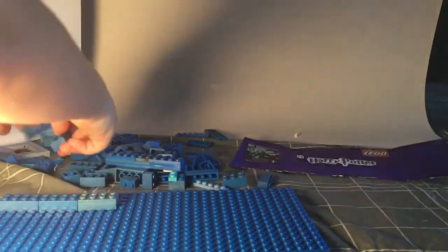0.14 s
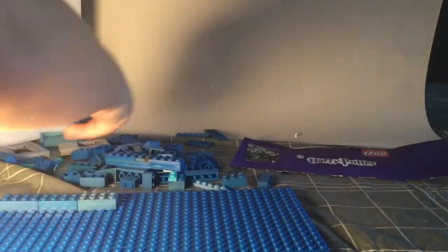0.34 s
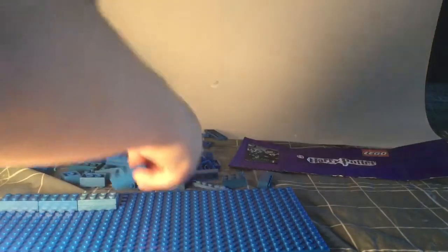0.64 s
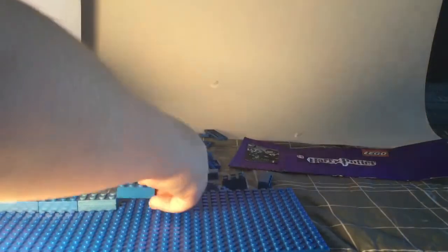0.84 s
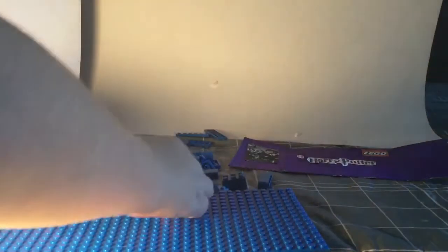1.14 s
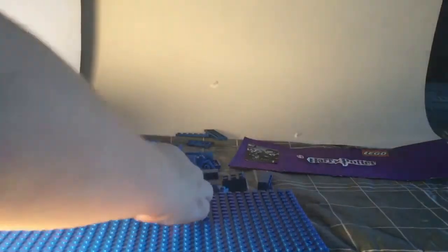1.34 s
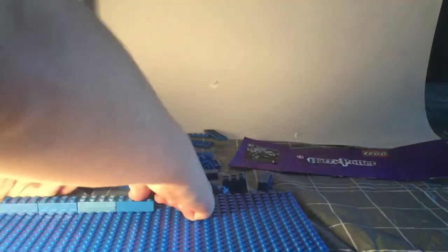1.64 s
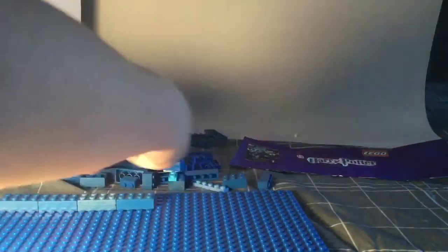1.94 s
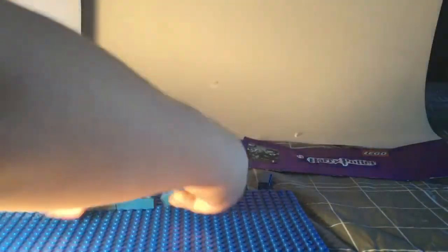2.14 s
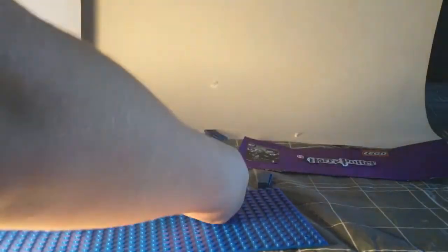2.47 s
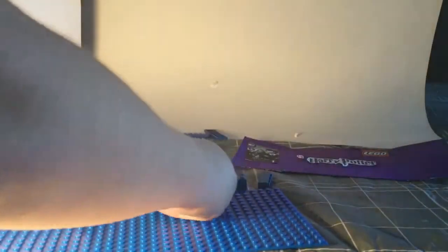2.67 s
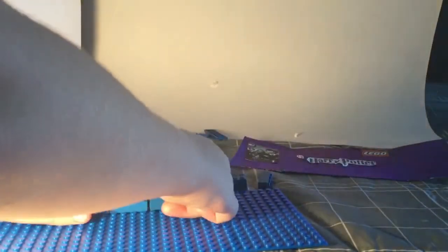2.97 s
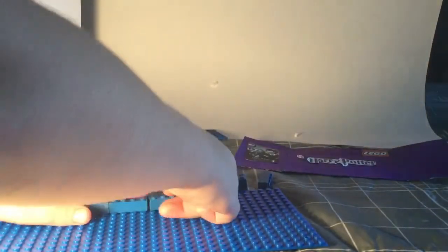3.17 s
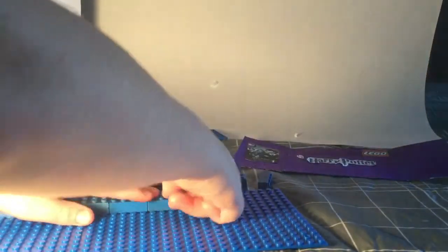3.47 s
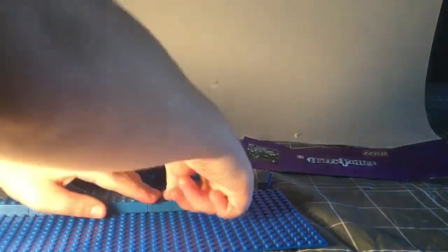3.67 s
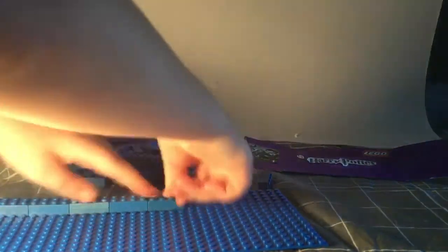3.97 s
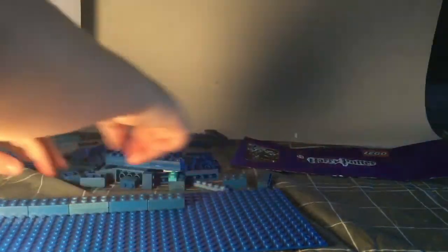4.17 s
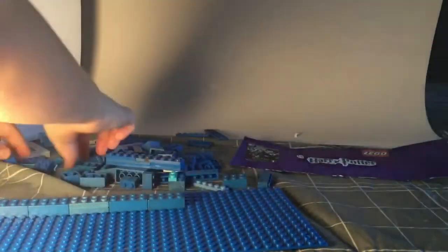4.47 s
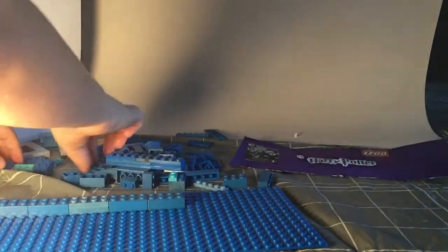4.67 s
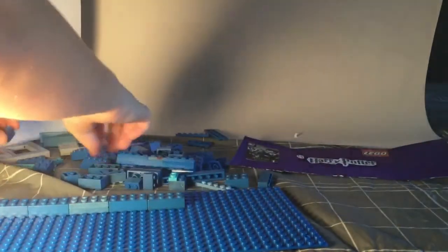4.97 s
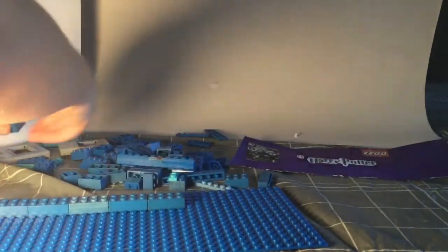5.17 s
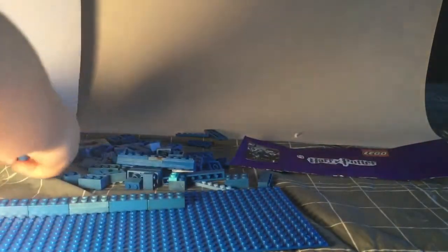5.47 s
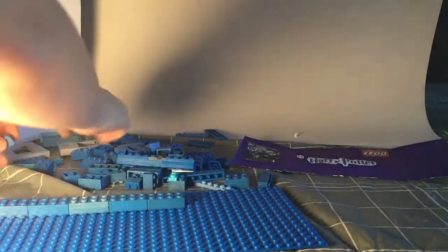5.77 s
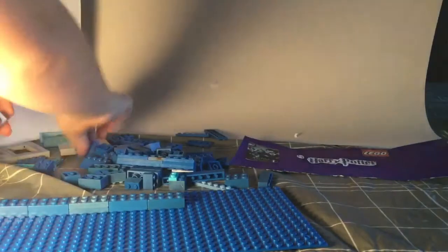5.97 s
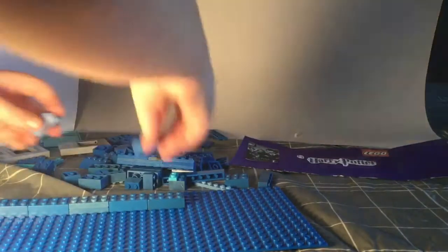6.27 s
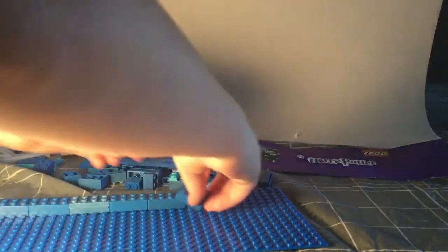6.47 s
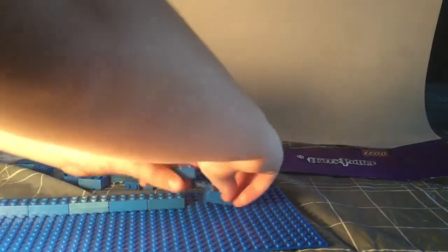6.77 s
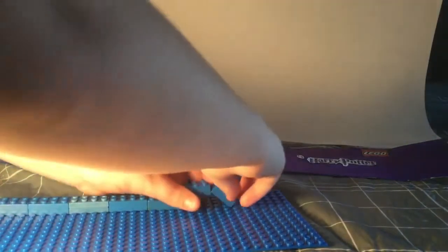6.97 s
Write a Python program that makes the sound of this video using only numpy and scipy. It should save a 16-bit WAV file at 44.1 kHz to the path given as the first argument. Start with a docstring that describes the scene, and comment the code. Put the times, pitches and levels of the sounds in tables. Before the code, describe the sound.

Plastic building bricks click as they are pressed onto a baseplate and rattle in a loose pile, over a faint indoor hum.

```python
"""Plastic building bricks click and rattle, picked from a loose pile and pressed onto a thin baseplate.
Each contact rings the plate and the hollow bricks in a small room; firm presses sound the board below.
Fingers rustle in the pile, palms brush the board, a machine hums and a cricket trills faintly far off.
A noise suppressor shuts the treble whenever nothing rises over the steady hiss."""
import sys
import numpy as np
from scipy import signal
from scipy.fft import rfft, irfft, next_fast_len
from scipy.io import wavfile
from scipy.ndimage import uniform_filter1d, minimum_filter1d

SR = 44100
rng = np.random.default_rng(int(sys.argv[2]) if len(sys.argv) > 2 else 0)


def digitize_waveform(pressure):
    """Quantize a signal to 16-bit integers and store it at the path in sys.argv[1].

    Rows of a 2-D input are taken as channels; values are limited to [-1, 1].
    """
    field = np.atleast_2d(pressure).T
    bounded = np.clip(field, -1, 1)
    quanta = np.round(bounded * 32767).astype(np.int16)
    wavfile.write(sys.argv[1], SR, quanta)


N = 313551

# Plastic meeting plastic. Each row: start in seconds, levels in dB of the plate, brick walls, studs
# and edge tick, then the leading pitch in Hz of the plate and of the walls.
CONTACTS = [(0.0144, -46, -21, -19.5, -29, 1350, 5000), (0.0229, -67, -31, -29, -37.5, 1510, 4200),
            (0.578, -65, -72, -50.5, -85, 1460, 5300), (0.664, -45, -58, -62, -63, 1270, 2400),
            (0.6732, -27.5, -27.5, -33, -43, 1685, 3350), (0.742, -48, -72, -78, -85, 1590, 4020),
            (0.8306, -78, -53, -76, -85.5, 1780, 4930), (0.856, -29, -26, -37.5, -34.5, 1396, 4900),
            (0.9673, -40.5, -43, -60, -68, 1730, 2840), (0.9802, -45, -50, -57, -56.5, 1290, 3910),
            (1.0105, -35.5, -50, -63, -59.5, 1290, 3290), (1.0282, -39, -36, -57, -59.5, 1900, 2320),
            (1.0339, -14, -16, -25.5, -31, 1690, 3100), (1.038, -25, -39, -36, -48, 1890, 3590),
            (1.186, -48.5, -50.5, -53, -51.5, 1580, 4170), (1.2279, -48, -82.5, -86, -85, 1620, 3600),
            (1.2562, -37.5, -52.5, -73, -85, 1670, 3610), (1.382, -45, -35.5, -40.5, -36, 1220, 3200),
            (1.4002, -47, -47, -50, -47, 1550, 3500), (1.42, -44, -45, -52, -53, 1700, 3840),
            (1.4487, -40, -34.5, -40, -30.5, 1620, 5300), (1.46, -38, -62, -64, -63, 1650, 3920),
            (1.4782, -60, -71, -61, -49.5, 1640, 5170), (1.49, -46.5, -47, -56, -52, 1560, 2720),
            (1.516, -55, -48, -50, -50, 1670, 3150), (1.5379, -31.5, -49, -43.5, -36, 1600, 2700),
            (1.6937, -44.5, -50, -48, -47.5, 1650, 2630), (1.72, -40.5, -45, -47.5, -43.5, 1530, 3210),
            (1.7522, -50.5, -60, -61.5, -55.5, 1750, 3700), (2.1498, -29, -36, -37, -43.5, 1560, 4170),
            (2.1634, -30.5, -32, -37, -48, 1753, 2990), (2.168, -31, -50, -53.5, -62.5, 1516, 3490),
            (2.2106, -29, -37.5, -43, -54, 1610, 2760), (2.2301, -34.5, -47, -39, -35.5, 1410, 3510),
            (2.241, -40, -64, -48, -54, 1500, 3490), (2.2758, -40, -48, -42.5, -44, 1690, 2660),
            (2.305, -38, -49, -49, -55, 1490, 2550), (2.3195, -37, -41.5, -50, -61, 1390, 2600),
            (2.3255, -60, -43, -44, -37.5, 1340, 3770), (2.365, -42, -79, -85, -85, 1210, 2640),
            (2.3914, -44.5, -42, -49.5, -44.5, 1660, 2700), (2.4242, -48, -69, -49.5, -53.5, 1640, 3420),
            (2.4502, -52.5, -52, -51, -62, 1770, 2490), (2.5121, -38.5, -55, -78, -85, 1440, 2340),
            (2.6046, -41, -51.5, -48, -49.5, 1640, 2370), (2.637, -47, -57, -57, -56, 1460, 3940),
            (2.646, -22, -22.5, -30.5, -27, 1610, 3230), (2.656, -49, -31, -45, -56, 1510, 3520),
            (2.7231, -44, -45, -51, -50, 1680, 3360), (2.8423, -36, -60, -71, -84, 1620, 2900),
            (2.8537, -42.5, -37.5, -43.5, -42, 1680, 3520), (2.8659, -43, -40, -57, -65.5, 1680, 3500),
            (2.8773, -47, -47, -58, -67.5, 1650, 3200), (2.895, -48, -61, -80, -85, 1650, 3600),
            (2.9969, -27.5, -37, -39, -32.5, 1640, 3070), (3.0092, -41, -38.5, -42, -40, 1650, 2650),
            (3.0579, -33, -42, -57.5, -48.5, 1570, 2830), (3.065, -35.5, -48.5, -63.5, -65, 1580, 3600),
            (3.0709, -39.5, -47.5, -64, -62.5, 1554, 3430), (3.224, -40, -52, -69, -68, 1960, 2360),
            (3.2332, -19.5, -22.5, -28, -33.5, 1502, 2774), (3.2516, -41, -45, -49, -44.5, 1310, 3530),
            (3.2966, -52, -43, -69, -83, 1250, 3500), (3.4459, -52.5, -48, -43, -37, 1560, 3260),
            (3.508, -50.5, -84.5, -76, -69.5, 1590, 3450), (3.566, -46, -56.5, -57, -50.5, 1300, 2370),
            (3.7118, -44.5, -68, -79, -85, 1580, 2340), (3.7479, -42.5, -44, -48.5, -44, 1770, 3920),
            (3.864, -52.5, -84.5, -85, -85, 1580, 2900), (3.919, -50.5, -75, -82.5, -85, 1540, 3570),
            (3.9598, -44, -49.5, -61.5, -68.5, 1530, 2940), (3.9862, -37.5, -49, -57, -51, 1540, 3790),
            (4.4396, -50, -35.5, -42.5, -80, 1870, 4100), (4.5856, -47, -40.5, -43, -51, 1960, 4200),
            (4.6, -55, -39, -36, -45.5, 1750, 4000), (4.6092, -35, -22.5, -25, -36, 1970, 4730),
            (4.613, -41, -21.5, -32, -35.5, 1870, 4670), (4.621, -45, -36, -29, -36, 1750, 4170),
            (4.6289, -37, -40, -40, -43, 1760, 4120), (4.6681, -49, -25, -32, -33.5, 1580, 4430),
            (4.6762, -32.5, -22, -20.5, -28, 1700, 5250), (4.686, -53, -36, -38, -39.5, 1610, 4600),
            (4.703, -57, -36, -35, -39.5, 1630, 3980), (4.7161, -47, -24.5, -32, -38.5, 1770, 2540),
            (4.7426, -48, -47, -50, -48.5, 1500, 3830), (4.7507, -36.5, -28.5, -37, -39.5, 1840, 4240),
            (4.7743, -52, -35.5, -45, -46, 1690, 3970), (4.856, -67, -59, -50.5, -55.5, 1420, 4590),
            (4.9048, -50, -41, -59, -62, 1640, 2660), (4.9181, -34, -33, -51, -48, 1580, 3600),
            (4.9349, -62, -42, -44, -52.5, 1590, 4440), (4.964, -67, -49, -54, -82, 1150, 2730),
            (4.9853, -51, -46, -56, -73, 1640, 2720), (4.9978, -46, -40.5, -56, -69, 1360, 4550),
            (5.0104, -58, -31.5, -37, -52, 1800, 4770), (5.033, -68, -34.5, -34.5, -41, 1620, 4840),
            (5.042, -84, -53, -42, -44, 1150, 5070), (5.0609, -72, -57, -53, -55, 1250, 4390),
            (5.1336, -81, -44.5, -56, -79, 1430, 5000), (5.1468, -48.5, -33.5, -34, -48, 1650, 4140),
            (5.1888, -56, -42, -47, -60.5, 1470, 4250), (5.8748, -53, -45, -59, -55, 1346, 2900),
            (5.8809, -50.5, -34.5, -48, -53, 1430, 2670), (5.8917, -52.5, -34.5, -48, -55, 2000, 3020),
            (5.934, -50, -43.5, -42, -41, 1960, 2660), (6.0064, -47.5, -34.5, -36.5, -41.5, 1520, 2700),
            (6.0288, -53.5, -43.5, -54.5, -56.5, 1510, 3650), (6.353, -15, -21.5, -23, -31.5, 1502, 3410),
            (6.3619, -18.5, -19, -34, -37.5, 1500, 4580), (6.368, -37, -46, -43, -44, 1530, 3330),
            (6.3854, -19, -29, -36, -47, 1610, 5000), (6.3961, -25, -40, -41, -38, 1660, 3170),
            (6.4095, -21, -52, -53, -53, 1480, 4080), (6.414, -15.5, -19, -35, -46, 1600, 4400),
            (6.4191, -15.5, -16.5, -30, -35.5, 1590, 4420), (6.4261, -19.5, -23, -32.5, -33.5, 1340, 2640),
            (6.4367, -35, -42, -52, -61.5, 1660, 3100), (6.5743, -29.5, -37, -54, -68.5, 1610, 3380),
            (6.6019, -24, -35, -42, -45.5, 1660, 2810), (6.611, -43, -53, -50, -60, 1350, 2300),
            (6.701, -30.5, -40.5, -59, -73, 1510, 2730), (6.7298, -33, -43.5, -67, -85, 1500, 3900),
            (6.7532, -35.5, -48, -47, -43, 1485, 3070), (6.7752, -38, -42.5, -53, -67, 1690, 4000),
            (6.8334, -21.5, -27.5, -37.5, -44.5, 1513, 3190), (6.863, -33, -57, -58, -65, 1660, 5100),
            (6.871, -48, -48, -49, -57.5, 1590, 3220), (6.8754, -22.5, -31, -52, -48.5, 1645, 3140),
            (6.906, -30, -37.5, -46, -55, 1520, 3150), (7.06, -43, -54, -63.5, -62, 1465, 2380),
            (7.0812, -42.5, -76, -58, -67, 1770, 2720)]


def amp(db):
    """Decibels to gain."""
    return 10 ** (np.asarray(db) / 20)


def unit(x):
    """Scale to an rms of 1."""
    return x / np.sqrt(np.mean(x ** 2) + 1e-20)


def along(points, hz):
    """Read a curve of (Hz, value) points on a log frequency axis."""
    point_hz, values = np.transpose(points)
    return np.interp(np.log(hz + 1), np.log(point_hz + 1), values)


def filtered(x, response):
    """Equalise x with a gain curve over frequency."""
    size = next_fast_len(N + SR // 4)
    return irfft(rfft(x, size) * response(np.fft.rfftfreq(size, 1 / SR)), size)[..., :N]


def noise(response):
    """Coloured noise with an rms of 1."""
    return unit(filtered(rng.standard_normal(N), response))


def band(centre_hz, width_hz):
    """A bell-shaped pass band."""
    return lambda hz: np.exp(-2 * ((hz - centre_hz) / width_hz) ** 2)


def grain(depth_db):
    """The quick, random level flicker of rubbing surfaces."""
    return unit(amp(depth_db * unit(uniform_filter1d(rng.standard_normal(N), size=120))))


def hum_and_hiss():
    """A machine hums with unsteady tones over the hiss of room and microphone."""
    # Two noise colours. Each row: frequency in Hz, relative level in dB.
    hum_colour = [(18, -93.5), (30, -69.5), (76, -18), (146, -9.5), (180, -10), (211, -10.5), (270, -2.5),
                  (482, -19), (923, -27.5), (1060, -18.5), (1180, -20), (1510, -30.5), (2000, -76.5),
                  (2600, -101), (4400, -120)]
    hiss_colour = [(1200, -39.5), (1800, -1), (4000, -1), (9000, -3), (17000, -10)]
    # The machine's tones. Each row: centre in Hz, width in Hz, relative level in dB.
    hum_tones = [(90.86, 13, -10.5), (178.5, 2.7, -6.5), (277, 14, 1.5), (308, 3.4, -13),
                 (373.9, 4.7, -7.5), (418, 24, -7.5)]
    tone_power = lambda hz: sum(amp(db) ** 2 * band(centre, width)(hz) ** 2 / width
                                for centre, width, db in hum_tones)
    hum = amp(-61.5) * noise(lambda hz: amp(along(hum_colour, hz)))
    tones = amp(-64) * noise(lambda hz: np.sqrt(tone_power(hz)))
    hiss = amp(-69) * noise(lambda hz: amp(along(hiss_colour, hz)))
    return hum + tones + hiss


def palms():
    """Palms and wrists brush the board unevenly: a deep rub under a grainy one."""
    # The brushing's fader. Each row: time in seconds, level in dB.
    fader = [(0, -72.5), (.5, -68), (.85, -70.5), (1.1, -66.5), (1.6, -66), (2, -71.5), (2.4, -68.5),
             (2.85, -72.5), (3.15, -68), (4, -67), (4.4, -76), (5, -76.5), (5.9, -69), (6.35, -67),
             (7.11, -72.5)]
    level = amp(np.interp(np.arange(N) / SR, *np.transpose(fader)))
    waver = lambda: amp(1.5 * noise(band(0, 8.5)))  # a slow drift of about 1.5 dB
    deep = amp(0.8) * waver() * noise(band(200, 58))
    grainy = waver() * grain(depth_db=1) * noise(band(610, 610))
    return level * (deep + grainy)


def pile_rustle():
    """Stirred and sliding plastic rubs low in the plate's range and high in the bricks'."""
    # The rustle's faders. Each row: time in seconds, low layer in dB, high layer in dB.
    faders = [(0, -76.5, -85), (.6, -73, -102), (.8, -64.5, -77.5), (1.05, -63.5, -70),
              (1.25, -70.5, -95.5), (1.55, -64, -91.5), (1.8, -74, -98.5), (2.18, -76, -96.5),
              (2.3, -62, -73), (2.5, -72, -92), (3.1, -73, -95), (3.3, -69.5, -77.5), (3.6, -66, -86.5),
              (4.1, -70, -98.5), (4.5, -79, -104), (4.7, -64, -71.5), (4.9, -75, -77), (5.3, -82, -95),
              (6.3, -76, -94), (6.48, -55.5, -70.5), (6.7, -61, -78), (7.11, -70, -84.5)]
    # The high layer's gritty colour. Each row: frequency in Hz, relative level in dB.
    grit = [(2000, -31), (3000, 3), (5000, 3), (9000, -10.5), (15000, -16)]
    times, low_db, high_db = np.transpose(faders)
    t = np.arange(N) / SR
    low = grain(depth_db=2.5) * noise(band(1300, 600))
    high = grain(depth_db=1.0) * noise(lambda hz: amp(along(grit, hz)))
    return low * amp(np.interp(t, times, low_db)) + high * amp(np.interp(t, times, high_db))


def plastic_ring(modes, lead_hz, attack_s, detune, crack_db, scatter_db=3, fade_db_per_octave=8):
    """Each contact starts with a dry crack; the spot struck favours its own pitch and modes near it."""
    hz, db, t60 = np.transpose(modes)[..., None]
    lead_hz = lead_hz[:, None, None]
    chance = rng.standard_normal((len(CONTACTS), 3, len(modes), 1))
    t = np.arange(SR // 25) / SR
    octaves_away = np.abs(np.log2(hz / lead_hz))
    nearest = octaves_away == octaves_away.min(axis=1, keepdims=True)
    pitch = np.where(nearest, lead_hz, hz * (1 + detune * chance[:, 0]))
    favour_db = 5 * np.exp(-(np.log(pitch / lead_hz) / .06) ** 2) - fade_db_per_octave * octaves_away
    phase = 2 * np.pi * pitch * t + 0.91 * chance[:, 2]
    envelope = amp(db + favour_db + scatter_db * chance[:, 1] - 60 * t / t60)
    ring = np.sum(envelope * np.sin(phase), axis=1) * (1 - np.exp(-t / attack_s))
    ring /= np.abs(ring).max(axis=1, keepdims=True)
    crack = amp(-60 * t / .003) * rng.standard_normal(ring.shape)
    return ring + amp(crack_db) * crack / np.linalg.norm(crack, axis=1, keepdims=True)


def room_response(early_db, early_t60, tail_db, tail_t60):
    """Direct sound, close reflections and a tail, new for every contact."""
    t = np.arange(SR // 4) / SR
    decay = lambda t60: amp(-60 * t / t60) * (1 - np.exp(-t / 0.0033))
    layer = lambda db, t60: amp(db) * decay(t60) / np.linalg.norm(decay(t60))
    envelope = np.hypot(layer(early_db, early_t60), layer(tail_db, tail_t60))
    response = rng.standard_normal((len(CONTACTS), len(t))) * envelope
    response[:, 0] = 1  # the direct sound
    return response


def at_contacts(sounds):
    """Lay each contact's sound on the timeline."""
    track = np.zeros(N + SR)
    for (start, *_), sound in zip(CONTACTS, sounds):
        track[round(start * SR):][:len(sound)] += sound
    return track[:N]


def brick_clicks():
    """Every contact rings four parts, each at its own strength: plate, walls, studs and edges."""
    # The parts' modes. Each row: pitch in Hz, relative level in dB, seconds to fall by 60 dB.
    plate = [(1270, -5, 0.021), (1430, -5.5, 0.016), (1530, -0.5, 0.02), (1690, 1.5, 0.017),
             (1870, -6.5, 0.014), (2150, -10, 0.014)]
    walls = [(2490, -6, 0.017), (2800, -10, 0.03), (3316, 0.5, 0.0076), (3600, -3, 0.009),
             (3920, 1.5, 0.0073), (4600, -5, 0.0084), (4840, -8.5, 0.023), (5190, -9.5, 0.0099)]
    studs = [(5860, -5.5, 0.0062), (6700, -0.5, 0.0085), (7300, -1.5, .008), (8090, 0.5, 0.0085),
             (8350, 1, 0.0062), (9140, 3, 0.011)]
    edges = [(10480, 2.5, 0.0053), (11330, -4.5, 0.0066), (11760, -3.5, .005), (12870, 4, 0.0021),
             (14700, -4, 0.0033)]
    # What each part radiates. Each row: low cut in Hz, high cut in Hz, contact time in seconds.
    ranges = [(985, 2315, 0.00037), (2000, 6340, 0.00013), (5140, 9800, 0.00022), (9400, 42000, 0.000058)]
    # The room's answer to each part. Each row: early reflections in dB, their 60 dB decay in seconds,
    # then the same pair for the tail.
    room = [(-7.5, 0.04, -10, 0.24), (-4, .05, -7.5, 0.28), (-6.5, 0.026, -9.5, 0.23),
            (-5.5, 0.03, -12.5, 0.34)]
    # The brick in hand. Each row: start in seconds, leading pitch of its studs in Hz.
    in_hand = [(0, 6650), (1.3, 8000), (1.5, 9200), (1.6, 7900), (2.1, 6700), (2.65, 5950), (2.95, 7900),
               (3.6, 8900), (4.59, 5950), (4.65, 7900), (4.7, 6000), (5.02, 8600), (5.98, 5850),
               (6.3, 8600)]
    starts, *levels_db, plate_hz, walls_hz = np.transpose(CONTACTS)
    held_since, held_hz = np.transpose(in_hand)
    studs_hz = held_hz[np.searchsorted(held_since, starts) - 1]
    edge_hz = rng.choice(np.array(edges)[:, 0], size=len(starts))  # any edge may lead the tick
    parts = [(plate, plate_hz, .015, 13), (walls, walls_hz, .04, 10.5),
             (studs, studs_hz, .04, 12), (edges, edge_hz, .04, 8)]
    track = np.zeros(N)
    for k, (modes, lead_hz, detune, crack_db) in enumerate(parts):
        low_hz, high_hz, contact_s = ranges[k]
        rings = plastic_ring(modes, lead_hz, contact_s, detune, crack_db)
        in_room = signal.fftconvolve(rings, room_response(*room[k]), axes=1)
        passband = signal.butter(3, [low_hz, min(high_hz, SR / 2.2)], "bandpass", fs=SR, output="sos")
        track += signal.sosfilt(passband, at_contacts(amp(levels_db[k])[:, None] * in_room))
    return track


def finger_scuffs():
    """Fingers stroke and stir the plastic in short swells of rough noise."""
    # Each row is a stroke: midpoint and length in seconds, centre and width in Hz, level in dB.
    strokes = [(0.445, .03, 7000, 1210, -64.5), (0.6, .07, 7000, 900, -72),
               (0.97, .063, 11000, 4000, -70.5), (1.46, 0.17, 11000, 4860, -70),
               (1.9, .1, 7500, 5000, -69.5), (3.32, .14, 1100, 500, -61.5), (3.404, .073, 6700, 1500, -67),
               (3.2, .12, 9600, 5030, -69), (3.63, .12, 2800, 400, -70), (3.974, .12, 9400, 9050, -65),
               (3.987, .2, 1420, 910, -59), (4.515, .06, 7200, 1510, -68), (4.639, .051, 4500, 3500, -40.5),
               (4.721, .2, 5000, 5000, -45.5), (5.202, .16, 8200, 1500, -65.5),
               (5.535, .087, 7920, 1990, -61), (5.904, .12, 6000, 8000, -62.5), (7, 0.13, 2710, 616, -74.5),
               (6.315, .14, 3520, 3070, -66), (7.068, .06, 11100, 3800, -66.5)]
    track, roughness = np.zeros(N), grain(depth_db=2.0)
    hz = np.fft.rfftfreq(SR // 4, 1 / SR)
    for middle, length, centre, width, db in strokes:
        n = int(length * SR)
        spectrum = rfft(rng.standard_normal(SR // 4)) * band(centre, width)(hz)
        track[int(middle * SR) - n // 2:][:n] += amp(db) * unit(irfft(spectrum))[:n] * np.hanning(n)
    return track * roughness


def cricket(pitch_hz=4870, sink_hz_per_s=500, wing_hz=55):
    """Wing strokes pulse a thin tone that sinks through each trill; echoes blur it."""
    # Each row is a trill: midpoint in seconds, length in seconds, level in dB.
    trills = [(.79, 0.29, -69), (1.603, 0.31, -71), (3.37, 0.24, -67), (4.14, 0.29, -69.5),
              (5.341, 0.27, -67.5), (5.851, .18, -71), (6.97, 0.26, -71)]
    track, t = np.zeros(N), np.arange(N) / SR
    for middle, length, db in trills:
        offset = t - middle
        swell = np.cos(np.pi * np.clip(offset / length, -.5, .5)) ** 2
        tone = np.sin(2 * np.pi * (pitch_hz * offset - sink_hz_per_s / 2 * offset ** 2))
        track += amp(db) * swell * tone
    wing_strokes = 1 + 0.58 * np.sin(2 * np.pi * wing_hz * t)
    blur = 1 + 0.38 * noise(band(0, 200))
    return wing_strokes * blur * track


def board_knocks():
    """The board under the plate rings weakly with the firmest presses."""
    # The board's modes. Each row: pitch in Hz, relative level in dB, seconds to fall by 60 dB.
    modes = [(547, -3, 0.25), (686, 3, 0.057), (770, -2, 0.11), (990, -3, .07)]
    # Presses that reach the board. Each row: start in seconds, relative strength in dB.
    presses = [(0.671, -49), (0.856, -51.5), (1.034, -36.5), (1.538, -57), (2.149, -53.5), (2.645, -48),
               (2.996, -66.5), (3.232, -47.5), (3.565, -49.5), (3.985, -65), (6.352, -48.5), (6.418, -40.5),
               (6.601, -54.5), (6.832, -54.5)]
    track, t = np.zeros(N + SR), np.arange(SR // 4) / SR
    hz, db, t60 = np.transpose(modes)[..., None]
    attack = 1 - np.exp(-t / 0.0012)
    for start, press_db in presses:
        envelope = amp(press_db - 7.5 + db + rng.normal(0, 3.7, db.shape) - 60 * t / t60)
        knock = np.sum(envelope * np.sin(2 * np.pi * hz * t), axis=0)
        track[round(start * SR):][:len(t)] += attack * knock
    return track[:N]


def scene():
    """Bricks, hands and background meet at one microphone."""
    building = brick_clicks() + board_knocks() + pile_rustle() + finger_scuffs() + palms()
    return (building + cricket() + hum_and_hiss())[None]


def noise_suppressor(x, band_threshold_db=6, wide_threshold_db=5, knee_db=2, release_s=.03):
    """Each band opens when it, or its wide neighbourhood, rises over its floor; it holds, then closes."""
    # The fully closed gate. Each row: frequency in Hz, gain in dB.
    closed_curve = [(1100, -1.5), (1500, -1), (1900, -24.5), (5000, -27), (16000, -32)]
    hz, t, spectra = signal.stft(x, SR, nperseg=1024, noverlap=768)
    power = uniform_filter1d(np.abs(spectra) ** 2, size=11, axis=0)
    power = uniform_filter1d(power, size=3, axis=1)
    floor = np.percentile(power[:, ::4], 20, axis=1, keepdims=True)
    rise_db = 10 * np.log10(np.abs(power) / floor + 1e-9)
    wide_db = uniform_filter1d(rise_db, size=110, axis=0)
    held_db = -minimum_filter1d(-wide_db, size=9, origin=2, axis=1)  # peak hold
    over_db = np.maximum(rise_db - band_threshold_db, 0.48 * held_db + .4 * rise_db - wide_threshold_db)
    opened = 1 / (1 + np.exp(-np.clip(over_db / knee_db, -30, 30)))
    linger = np.exp(-t[1] / release_s)
    opened = np.maximum(opened, signal.lfilter([1 - linger], [1, -linger], opened, axis=1))
    gain = amp(along(closed_curve, hz)[:, None] * (1 - opened))
    return signal.istft(spectra * gain, SR, nperseg=1024, noverlap=768)[1][:N]


def record(dry):
    """The suppressor gates the hiss, then both ends roll off, with a hard ceiling at 16.9 kHz."""
    # The microphone path's response. Each row: frequency in Hz, gain in dB.
    microphone = [(42, -6), (60, 0.5), (15800, 0), (16100, -13), (16800, -17.5)]
    gated = noise_suppressor(dry[0])[None]
    return filtered(gated, lambda hz: amp(along(microphone, hz)) * (hz < 16900))


dry = scene()
out = record(dry)
digitize_waveform(out)
```